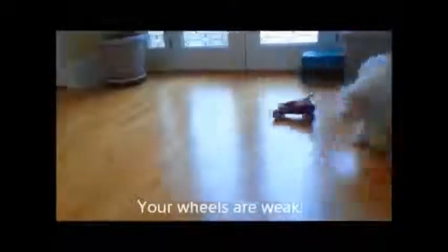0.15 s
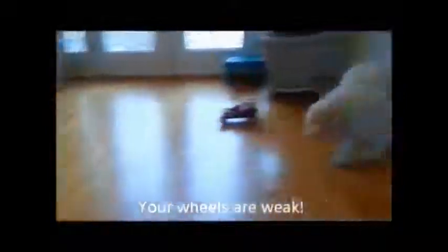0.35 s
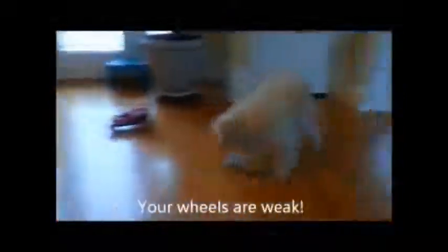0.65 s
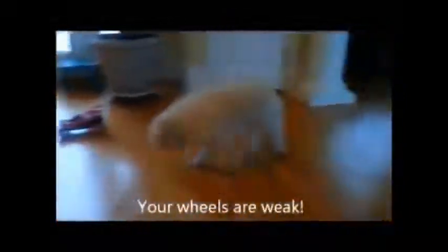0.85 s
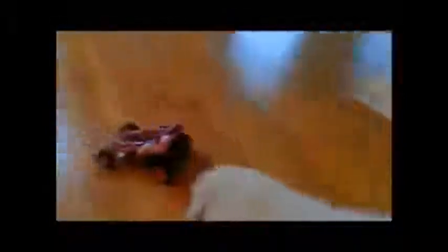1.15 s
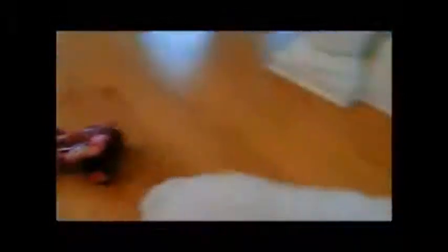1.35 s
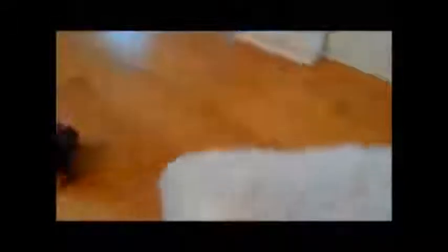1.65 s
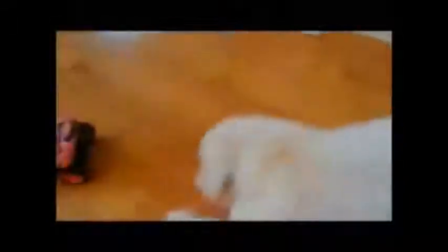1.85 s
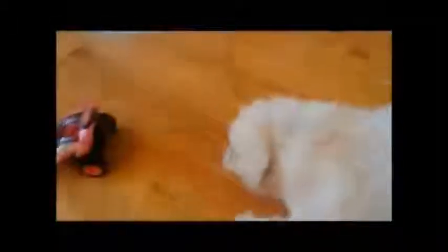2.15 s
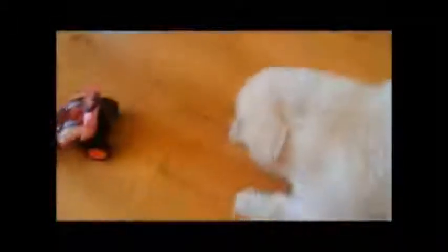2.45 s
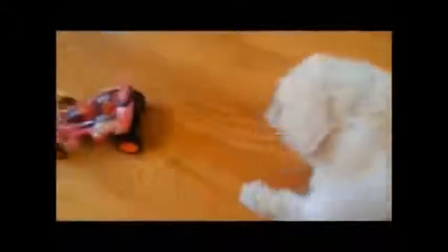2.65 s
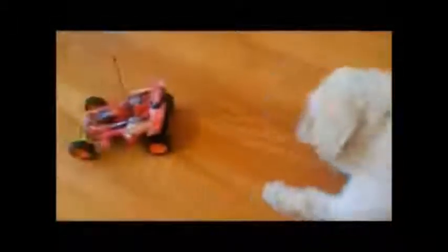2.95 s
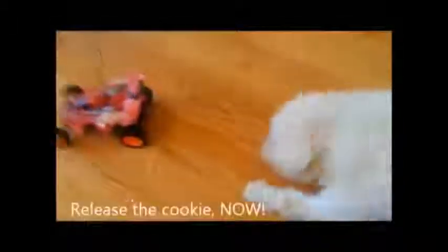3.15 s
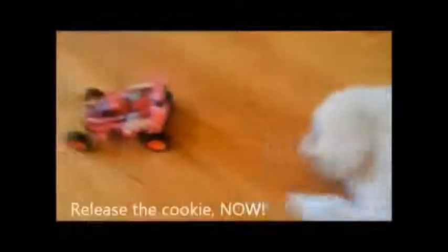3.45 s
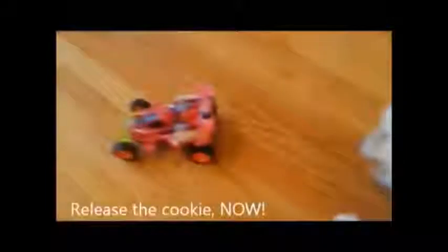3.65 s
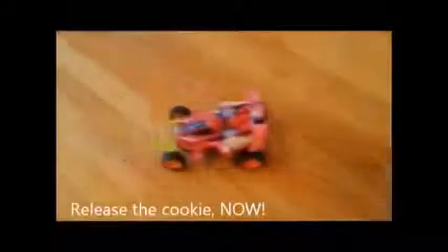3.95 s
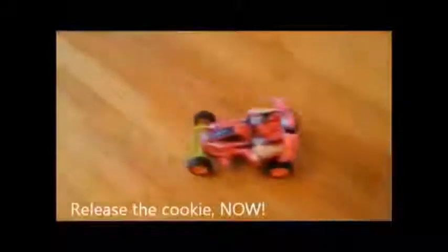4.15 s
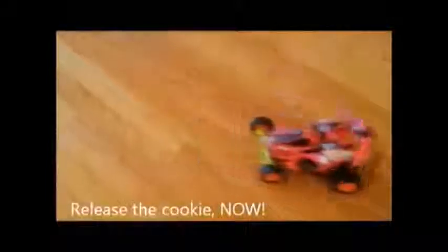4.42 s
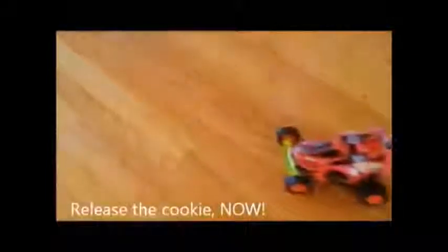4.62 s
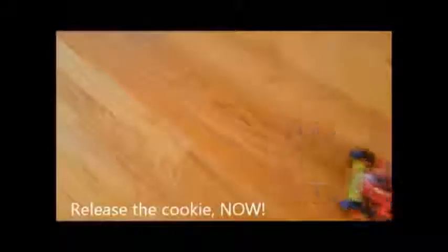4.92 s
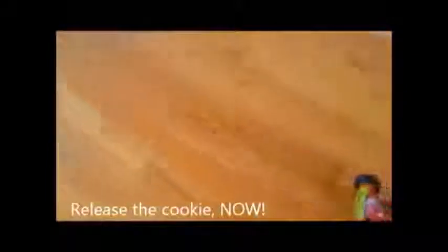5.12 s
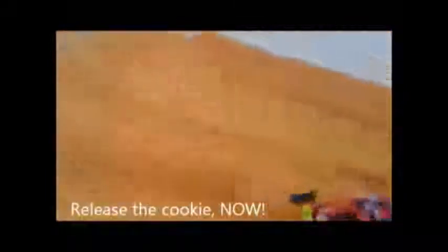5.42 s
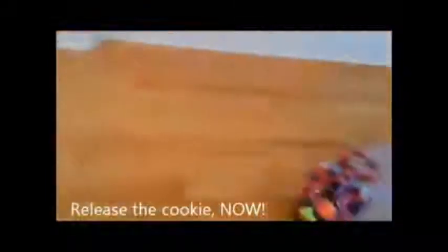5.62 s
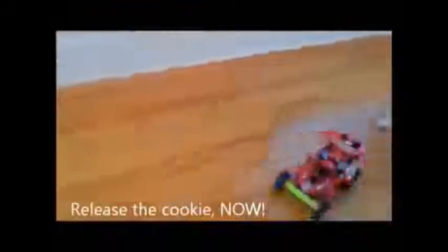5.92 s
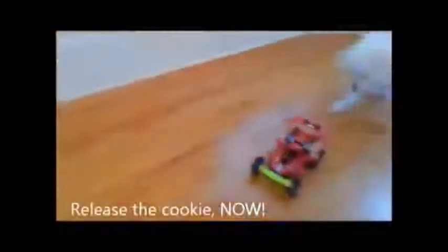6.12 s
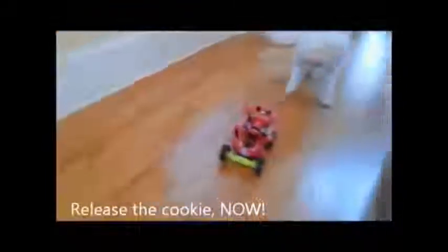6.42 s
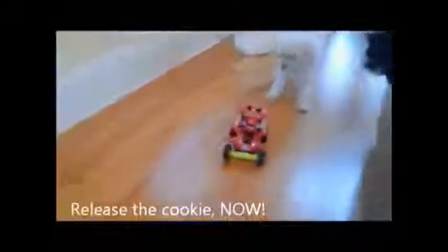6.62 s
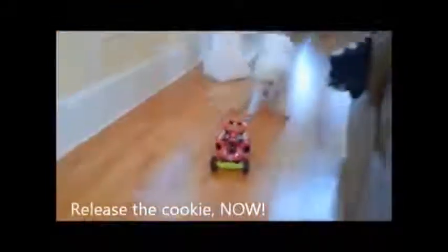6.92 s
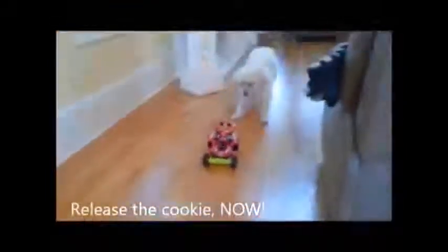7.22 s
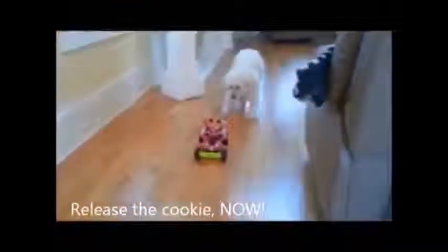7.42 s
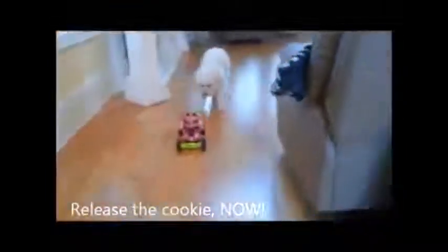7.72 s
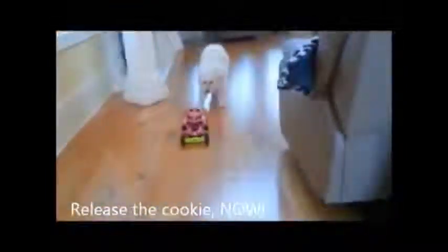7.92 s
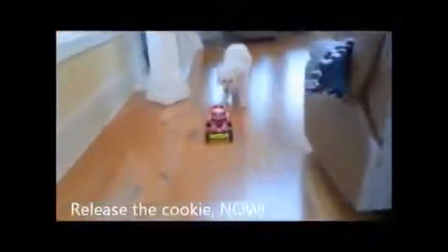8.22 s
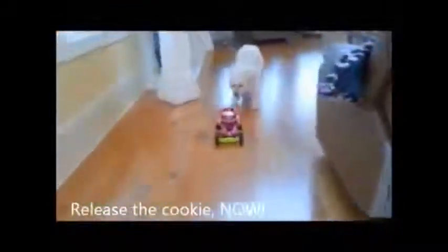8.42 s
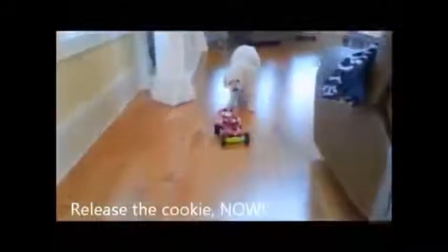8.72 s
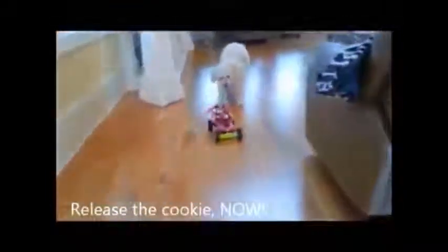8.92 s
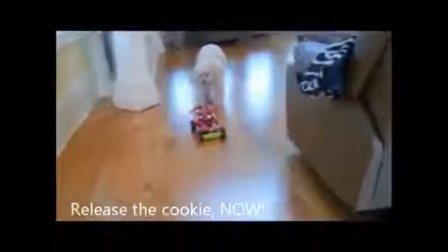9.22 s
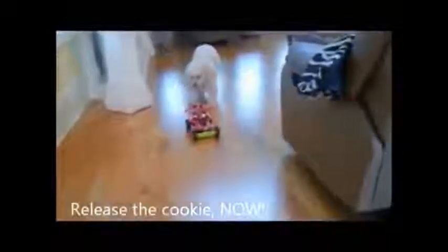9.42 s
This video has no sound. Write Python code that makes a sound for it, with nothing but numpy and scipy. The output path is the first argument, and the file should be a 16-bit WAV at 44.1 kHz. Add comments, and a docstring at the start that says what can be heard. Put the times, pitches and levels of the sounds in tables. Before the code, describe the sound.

A small motorised toy car drives in stop-start bursts on a wooden living-room floor. Gritty gear rasp and whir are strongest in the first few seconds, with a brief dropout just before a sharp restart. Weaker, choppy bursts follow, with plastic clicks and floor knocks clustering around five and six seconds, then a quieter stretch and two last whirs. Close stereo microphone, short room tail, faint deep rumble.

```python
"""Living room with a wooden floor: a toy car with a small geared motor runs in stop-start bursts.
Gears rasp, whir and fizz as shaped noise; wheels drum on the boards as noise through floor resonances.
Clicks are pings with noise bursts, bumps damped tones with ringing boards; a short room tail answers both.
Deep rumble lies below. Two microphone ports hear the car from changing sides.
Early on, the motor, wheels and rumble fade out within about 50 ms and return abruptly."""
import sys
import numpy as np
from scipy import signal
from scipy.fft import rfft, irfft, next_fast_len
from scipy.io import wavfile
from scipy.ndimage import uniform_filter1d, map_coordinates

SR = 44100
rng = np.random.default_rng(int(sys.argv[2]) if len(sys.argv) > 2 else 0)


def bounce(signal):
    """Save signal as a 16-bit WAV file at the path given by the first command-line argument."""
    frames = np.transpose(np.atleast_2d(signal))
    limited = np.clip(frames, -1, 1)
    pcm = np.round(limited * 32767).astype(np.int16)
    wavfile.write(sys.argv[1], SR, pcm)


N = 422037

# car position: time_s, left_over_right_db, left_late_ms, direct_share (0-1)
PLACE = [(.15, 0.4, -0.033, 0), (1.2, 2.2, 0.09, 0.25), (1.3, -1, .12, 0.18), (1.63, 1, 0.14, 0.1),
         (1.82, 0, 0.25, 0), (2.05, 0, 0.24, 0), (2.4, 0.5, 0.22, 0), (3.4, 0.5, 0.11, 0),
         (4.05, 0, 0.12, 0.06), (4.95, 2, -0.13, 0), (5.55, 1.5, -0.24, 0), (6.45, 0.5, -0.047, 0),
         (7.35, 0.5, 0.084, 0), (7.95, 0, 0.12, 0.24), (8.25, 1.5, 0.14, 0.23), (8.55, 0, 0.093, 0),
         (9.5, 0.5, 0.043, 0)]
# floor modes: centre_hz, width_hz, level_db
FLOOR_MODES = [(235, 28, 0), (290, 30, -5), (337, 22, -2), (490, 40, -8), (630, 40, -3)]


def amp(db):
    """dB to gain."""
    return 10 ** (np.asarray(db) / 20)


def unit(x):
    """Scale to rms 1."""
    return x / np.sqrt(np.mean(x ** 2) + 1e-20)


def along(points, hz):
    """Interpolate (Hz, value) points on a log frequency axis."""
    f, v = np.transpose(points)
    return np.interp(np.log(hz + 1), np.log(f + 1), v)


def curves(rows):
    """Interpolate each column after the time to one value per sample."""
    s, *cols = np.transpose(rows)
    return [np.interp(np.arange(N) / SR, s, c) for c in cols]


def wobble(rate_hz):
    """Smooth random curve with rate_hz knots a second."""
    knots = rng.standard_normal(int(N * rate_hz / SR) + 4)
    return map_coordinates(knots, [np.arange(N) * rate_hz / SR])


def filtered(x, response):
    """Multiply the spectrum of x by a response of frequency."""
    m = next_fast_len(x.shape[-1] + 8192)
    spectrum = rfft(x, m) * response(np.fft.rfftfreq(m, 1 / SR))
    return irfft(spectrum, m)[..., :x.shape[-1]]


def coloured(x, spectrum):
    """Shape x by (Hz, dB) points, rms 1."""
    return unit(filtered(x, lambda hz: amp(along(spectrum, hz))))


def modes(table):
    """Causal response of (Hz, width Hz, dB) resonances, summed with alternating sign."""
    def response(hz):
        total = 0
        for k, (centre, width, db) in enumerate(table):
            resonance = 1j * hz * width / (centre * centre - hz * hz + 1j * hz * width)
            total = total + (-1) ** k * amp(db) * resonance
        return total
    return response


def chatter(rate_hz, spread_db, life_s):
    """Irregular contacts: sudden starts of random size, each decaying exponentially; rms 1."""
    sizes = amp(spread_db * rng.standard_normal(N).clip(-2, 2))
    hits = (rng.random(N) < rate_hz / SR) * sizes
    return unit(signal.lfilter([1], [1, -np.exp(-1 / (life_s * SR))], hits))


def patchy(depth_db, ring_db=1.7):
    """Two noises sharing colour drift: broad patches, and narrow longer ones as resonances that come and go."""
    z = signal.stft(rng.standard_normal((2, N)), nperseg=512)[2]

    def patches(bins, frames):
        grid = rng.standard_normal(z.shape[1:])
        return unit(uniform_filter1d(uniform_filter1d(grid, bins, 0), frames, 1))

    drift_db = depth_db * patches(6, 10) + ring_db * patches(2, 24)
    return signal.istft(z * amp(drift_db), nperseg=512)[1][:, :N]


def car():
    """Gears, shell and fizz follow the drive; tooth contacts roughen all three, more at high direct share."""
    # spectra: freq_hz, density_db (per Hz)
    gear_spectrum, shell_spectrum, fizz_spectrum = [(1650, -21), (2800, -65), (3080, -7), (4040, -5.5),
                                                    (4550, -3.5), (5180, -0.5), (6200, -0.5), (7250, 1),
                                                    (8410, -3.5), (9130, -5.5), (9630, -9), (10900, -13),
                                                    (11500, -28), (15000, -111), (22000, -120)], [(440, -13), (750, -19), (818, -26),
                                                                   (926, -6.5), (1160, -2), (1570, -1.5),
                                                                   (1840, 2), (2060, 2.5), (2790, 0.5),
                                                                   (3300, -1.5), (4290, 1), (7260, -120)], [(5880, -67), (10000, -25),
                                                                                  (10800, 24), (12400, 16),
                                                                                  (14500, 8), (14900, -52),
                                                                                  (15200, -27)]
    # gear case resonances: centre_hz, width_hz, level_db
    case_modes = [(3600, 610, 0), (5740, 1040, 2.5), (7100, 810, -7.5)]
    # brief changes of gear bite: centre_s, change_db, half_length_s
    bites = [(.198, 4, .005), (.545, 4, .005), (1.303, 3, .004), (1.395, -0.5, 0.0055), (1.601, 6, 0.0086),
             (1.639, 7, 0.0053), (1.696, 3, 0.0067), (1.8, 2, .006), (1.833, 0, .003), (1.865, -5, .004),
             (1.869, 2, 0.0037), (1.897, 1, 0.005), (2.369, 6.5, .006), (2.402, 7, 0.0026), (2.43, 2, .002),
             (2.455, 4, 0.0058), (2.508, 5, .006), (2.535, 9, 0.0024), (2.768, 3.5, 0.0065),
             (2.837, 4, .01), (2.98, 3, .008), (3.292, 3, 0.014), (3.385, 8, 0.0068), (3.426, 3, 0.0035),
             (3.456, 6.5, 0.0034), (3.492, 4, 0.0051), (4.33, 2.5, 0.0079), (4.384, 3, 0.0065),
             (4.573, 2.5, .01), (5.167, 6, 0.0044), (5.226, 4, 0.0037), (7.312, 1.5, 0.013),
             (7.613, 5.5, .01), (7.78, 3, .015), (8.77, 0.5, 0.0098), (8.875, 3, .006), (9.04, 4, .006),
             (9.155, 4, .005), (9.19, 8.5, 0.0067), (9.312, 5, 0.012), (9.36, 2, .008)]
    rasp_db, whir_db, fizz_db, _ = drive()
    teeth = chatter(rate_hz=750, spread_db=3.5, life_s=.001) * (.7 + .6 * curves(PLACE)[2])

    # uneven wheels and gears throb the load
    judder_db = 1.0 * wobble(28) + 0.24 * wobble(65)
    t = np.arange(N) / SR
    for s, db, half_s in bites:
        judder_db = judder_db + db * np.exp(-((t - s) / half_s) ** 2)

    gears = coloured(patchy(1.2, 2.7) * (.9 + .6 * teeth) * amp(judder_db), gear_spectrum)
    case_ring = filtered(gears, lambda hz: np.abs(modes(case_modes)(hz)))
    gears = unit(gears + 0.44 * case_ring)
    shell = coloured(patchy(1.2, 2.4) * (1.3 + .4 * teeth) * amp(.8 * judder_db), shell_spectrum)
    fizz = coloured(patchy(4, 3) * (1.1 + .3 * teeth) * amp(1.2 * judder_db), fizz_spectrum)
    return band_colour(amp(rasp_db) * gears + amp(whir_db) * shell) + amp(fizz_db) * fizz


def drive():
    """Each burst rises from coasting, holds, falls and coasts: rasp, whir, fizz and axle levels in dB."""
    # throttle bursts: start_s, rise_s, hold_s, fall_s, rasp_db, sag_over_hold_db, coasting_rasp_db,
    # coasting_fade_db_per_s; re rasp: whir_db, fizz_db, axle_whine_db
    bursts = [(0.093, 0.13, 0.013, 0.14, -14, 3.5, -24.5, 3, -9, -15.5, -30),
              (0.321, 0.14, 0.31, 0.13, -21.5, 1, -35.5, 58, -7, -27, -19),
              (1.27, 0.0074, 0.1, 0.046, -18, 0.5, -30, 31, -11, -16, -36),
              (1.567, 0.15, 0.32, 0.092, -17.5, -3, -32, 11, -15.5, -26, -20),
              (2.32, 0.016, 0.072, 0.048, -19.5, 2, -23.5, 3, -17.5, -46, -16),
              (2.424, 0.027, 0.05, 0.041, -16, 3, -33, 56.5, -13, -46, -17.5),
              (2.907, 0.081, 0.011, 0.042, -42, 4, -48.5, 122, -5.5, -10, -19),
              (3.16, 0.028, .01, 0.074, -41, 8, -52.5, 3, -13, -10, -23),
              (3.252, 0.21, 0.039, 0.1, -19.5, 0, -31.5, 67, -10, -27, -15),
              (3.975, 0.032, .01, 0.062, -41.5, -0.5, -47.5, 10.5, -3, -9, -14),
              (4.112, 0.042, .01, 0.038, -37, 8, -40.5, 3, -3, -15, -21),
              (4.21, 0.14, 0.011, 0.1, -21.5, 5.5, -30, 3, -5.5, -22, -25),
              (4.417, 0.13, .01, 0.05, -27, -4, -32.5, 6, -1.5, -25, -38),
              (4.625, 0.062, .01, 0.062, -33, 1.5, -39.5, 28, -0.5, -28, -26),
              (5.002, 0.18, 0.24, 0.057, -27, -3, -29, 3, -3, -23, -17),
              (5.457, 0.07, 0.049, 0.061, -23.5, 2, -35, -7, -2.5, -27, -10),
              (5.83, 0.066, 0.11, 0.025, -29.5, -2.5, -29.5, 3, -1.5, -17.5, -23),
              (6.07, 0.027, 0.057, 0.075, -26.5, -2, -32, 3, -1, -24, -14),
              (6.268, 0.17, 0.11, 0.071, -23, 3.5, -35.5, 51, -5.5, -27, -20.5),
              (6.754, 0.024, .01, 0.086, -33, 2, -37.5, 18, -2, -22, -25),
              (7.081, 0.11, .01, 0.043, -34, 2, -40.5, 8, 0.5, -17, -16),
              (7.388, 0.24, 0.0061, 0.085, -37, -1.5, -38, 25, -3, -17, -20),
              (8.012, 0.034, 0.015, 0.14, -40.5, -0.5, -52.5, 34, -8.5, -14, -20),
              (8.192, .004, 0.0066, 0.018, -43.5, 1, -46, 3, 6, -15, -6),
              (8.24, 0.055, 0.057, 0.15, -39, 2, -56.5, 126, -7.5, -14, -30),
              (8.513, 0.18, 0.11, 0.19, -20, -1, -35, 28, -9, -42, -15),
              (9.111, 0.044, 0.016, 0.051, -30, 1.5, -31.5, 1, -3, -40, -10),
              (9.238, 0.081, 0.02, 0.18, -21.5, -5, -30.5, 3, -10, -50, -12)]
    early_share = 0.47  # share of the dB rise done after a third of its time
    coast_whir_db, still_whir_db = -3, -1.5  # re rasp, as coasting begins and ends
    axle_lingers_db = 5.5  # the whine drops less than the rasp off throttle
    rows, last_s, last_db, fade = [], 0, -31, 0  # opening rasp -31 dB
    for s, rise, hold, fall, top_db, sag_db, coast_db, next_fade, whir_db, fizz_db, axle_db in bursts:
        from_db = last_db - fade * max(s - last_s, 0)
        early_db = from_db + early_share * (top_db - from_db)
        last_s, last_db, fade = s + rise + hold + fall, coast_db, next_fade
        driven = (whir_db, fizz_db, axle_db)
        coasting = (coast_whir_db, fizz_db, axle_db + axle_lingers_db)
        rows += [(s, from_db, still_whir_db, fizz_db, axle_db),
                 (s + rise / 3, early_db, *coasting),
                 (s + rise, top_db, *driven),
                 (s + rise + hold, top_db - sag_db, *driven),
                 (last_s, coast_db, *coasting)]
    rows = np.array(rows)
    rows[:, 0] = np.maximum.accumulate(rows[:, 0])  # keep time in order where bursts overlap
    rasp_db, *others = curves(rows)
    return [rasp_db] + [rasp_db + db for db in others]


def band_colour(x):
    """Tone colour shifts over time: four bands are boosted or cut."""
    # bands: centre_hz, width_hz
    bands = [(2360, 310), (4050, 420), (5300, 660), (7300, 440)]
    # band gains: time_s, then gain_db of each band, low to high
    band_gains = [(.2, 0, -3.5, 0.5, -1), (.7, -3, 2, -1, -0.5), (1.35, 5, 1, 1.5, 3.5),
                  (1.65, -2, 0, 1, 3.5), (1.8, -1, 6, 3.5, 2.5), (1.95, -0.5, 3.5, -4, 0),
                  (2.2, 0, 0.5, 1, -0.5), (2.45, -1.5, 6, -1.5, 4), (2.75, -0.5, -2, 0, -3),
                  (3.45, 3, -0.5, 2, 5.5), (3.8, -1, -3, -1, -5.5), (4.33, 3.5, 2.5, 4.5, 4),
                  (4.7, 3, 0, 0.5, 3), (5.25, 5, 2.5, 2, -1), (5.55, -0.5, 4, 1, -5.5),
                  (5.95, 1, -0.5, 8.5, -3.5), (6.2, -6, -1.5, 1, 3), (6.45, -4, -0.5, 0.5, 2.5),
                  (7.1, -3, -3.5, 1.5, -2), (7.6, 1.5, -3.5, 2, 1.5), (8.75, 1, -1, -0.5, 1),
                  (9.05, 3, 2, 2, 2), (9.35, 0, 3, -5, 0.5)]
    for (hz, width), db in zip(bands, curves(band_gains)):
        x = x + (amp(db) - 1) * filtered(x, modes([(hz, width, 0)]))
    return x


def wheels():
    """Hard wheels crossing grain and joints drum on the floor and ring its boards; the axle whines."""
    # wheel levels: time_s, drumming_db; re drumming: low_board_db, middle_board_db, high_board_db
    wheel_levels = [(0, -35.5, -4, -14, -15), (.28, -30.5, -1.5, -2, -9.5), (.8, -43.5, -3, -7.5, -3.5),
                    (1.09, -56.5, -29, -14, -10), (1.23, -56.5, -17, 0, -14), (1.28, -38, -7, -9, -8),
                    (1.6, -45.5, 0.5, -5, -20), (1.81, -40, -14, -5, -24), (1.96, -35.5, -4, -8, -5.5),
                    (2.15, -44, -10, -8, -14), (2.48, -39.5, -12, -7.5, -19), (2.67, -58.5, -8, -9, -12),
                    (2.88, -65, -17, -14, -7), (3.01, -42, -2, -2, -17), (3.08, -51, 5, 0, -7),
                    (3.22, -61.5, -10, -11, -16), (3.49, -36.5, -9, -22, -12), (3.7, -52, -1, -3, -9),
                    (4.11, -52, -1, -3, -12), (4.19, -41.5, 0, -2, -9), (4.49, -43.5, -5, -16, -0.5),
                    (4.55, -35.5, 1, 0, -6), (4.64, -42, 3, -3, 2), (4.68, -35, 4, 0, 3),
                    (4.76, -41, 5.5, -1, 6), (5.02, -47.5, -4, -11, -4.5), (5.17, -38.5, -8, -15, -1.5),
                    (5.31, -29.5, 2.5, -1, -21), (5.59, -37, -16, -15, -13), (5.65, -50.5, -5, -9, 0),
                    (5.78, -40.5, -8, -4, -14), (5.96, -46.5, -13, -39, 0), (6.06, -42, -10, -5, -8),
                    (6.075, -30, -5, 0, -5), (6.12, -27, -3.5, 1.5, -16), (6.22, -33.5, -6, -8, -8),
                    (6.28, -34.5, -10, 7, -5), (6.35, -37, -1, -5, -4), (6.49, -41, -8, -6, -10),
                    (6.75, -53.5, -3, -21, -16), (6.82, -44.5, 4, -22, -0.5), (7.23, -47.5, -7.5, -11, -7),
                    (7.5, -42, -10.5, -5.5, -20), (7.99, -46, -5.5, -24, -20), (8.15, -59, -2, -10, -24),
                    (8.24, -54, -9, -8, -11), (8.3, -44, -4, -22, -27), (8.5, -62.5, -5, -20, -27),
                    (8.62, -45.5, -25, -30, -7), (8.84, -42, -12, -36, -1), (9.07, -46, -25, 5, -39),
                    (9.32, -42, -4.5, -21, -11), (9.57, -50, -20, -18, -3)]
    # broad drumming: freq_hz, density_db (per Hz)
    drum_spectrum = [(15, -59), (25, -12), (60, -8), (100, -3), (134, -4), (237, -8.5), (330, -11.5),
                     (465, -6.5), (647, -12), (900, -12.5), (1170, -38), (1980, -120)]
    # axle whine: centre_hz, width_hz, level_db
    axle_mode = [(1548, 117, 0)]
    drum_db, low_db, middle_db, high_db = curves(wheel_levels)
    axle_db = drive()[-1]
    joints = 1.1 + .4 * chatter(rate_hz=45, spread_db=4, life_s=.008)

    def ring(table):
        return unit(filtered(joints * rng.standard_normal((2, N)), modes(table)))

    boards = amp(low_db) * ring(FLOOR_MODES[:1])
    boards = boards + amp(middle_db) * ring(FLOOR_MODES[2:3])
    boards = boards + amp(high_db) * ring(FLOOR_MODES[4:])
    drumming = coloured(joints * patchy(1, 2.5), drum_spectrum)
    return amp(drum_db) * (drumming + boards) + amp(axle_db) * ring(axle_mode)


def clicks():
    """Chassis clicks: a short plastic ping at its own pitch, a rattle through the case and a bright edge."""
    # clicks: start_s, level_db, edge_re_level_db, rattle_t60_s (levels before the offsets below)
    click_rows = [(0.042, -12, -10.5, 0.082), (0.085, -8, -15, 0.077), (1.2853, -5, -34, 0.059),
                  (1.63, -12, -31, .02), (2.3295, -13, -19, 0.028), (3.0373, -22.5, -14, 0.088),
                  (3.175, -19, -13, 0.046), (3.182, -24, -18, 0.074), (3.408, -19, -9, .015),
                  (3.4152, -5, -18, 0.033), (3.999, -22, -20, .06), (4.006, -19, -19.5, .04),
                  (4.057, -22, -17, 0.055), (4.144, -23, -25, .03), (4.1627, -14, -30, .03),
                  (4.235, -13.5, -22, 0.033), (4.5083, -11, -32, 0.023), (4.627, -15, -27, .03),
                  (4.69, -10, -30, 0.046), (4.814, -9.5, -18, 0.06), (4.8245, -10.5, -11, 0.018),
                  (4.859, -13, -16, 0.074), (5.034, -18, -17, 0.04), (5.038, -22, -15, .03),
                  (5.079, -17, -15, 0.045), (5.086, -9, -23, .02), (5.1376, -24, -36, .05),
                  (5.2545, -4, -12, 0.04), (5.258, -9, -16, .05), (5.496, -11, -21, 0.064),
                  (6.0692, 0, -24, 0.051), (6.1255, -6, -24, 0.014), (6.772, -6, -23, 0.034),
                  (7.6255, -13, -15, 0.05), (7.985, -23.5, -20, 0.024), (8.015, -18, -16, .035),
                  (8.202, -29, -26, 0.03), (8.296, -18.5, -33, 0.057), (8.3567, -24, -15, 0.055),
                  (8.539, -33, -13, .04), (8.578, -27, -35, 0.07), (9.253, -5, -18, 0.03)]
    # rattle and edge colour: freq_hz, gain_db
    rattle_colour, edge_colour = [(300, -41), (1000, -13), (3500, -8), (6000, 1), (8000, -2), (11000, -28),
                                  (13000, -40)], [(8000, -17), (10500, -2.5), (15000, -15)]
    ping, rattle, edge = np.zeros((3, 2, N + SR))
    t = np.arange(SR // 5) / SR
    for s, db, edge_db, t60 in click_rows:
        span = slice(round(s * SR), round(s * SR) + len(t))
        hz = rng.normal(6770, 540)  # mean and spread, Hz
        burst = rng.standard_normal((2, len(t))) * amp(-60 * t / t60)
        phase = rng.uniform(0, 2 * np.pi, (2, 1))
        tone = np.sin(2 * np.pi * hz * t + phase) * (1 - np.exp(-t / .0003))
        ping[:, span] += amp(db - 3.5 - 60 * t / .01) * tone
        rattle[:, span] += amp(db - 3.0) * burst * (1 - np.exp(-t / .00086))
        edge[:, span] += amp(db + edge_db + 7) * burst * amp(-60 * t / .076)  # decays on top of the burst's
    rattle = filtered(rattle[:, :N], lambda hz: amp(along(rattle_colour, hz)))
    edge = filtered(edge[:, :N], lambda hz: amp(along(edge_colour, hz)))
    return ping[:, :N] + rattle + edge


def bumps():
    """A damped push at its own pitch, a knock about an octave up, and the boards ringing after it."""
    # bumps: start_s, level_db (before +4 dB on the push), pitch_hz, knock_re_push_db,
    # board_drive_re_level_db, board_drive_t60_s
    bump_rows = [(1.684, -22, 228, -15, 17.5, 0.059), (2.208, -25.5, 175, -4, 19, 0.081),
                 (2.983, -35, 604, -14, 23, .07), (3.448, -26, 293, -7, 9, 0.07),
                 (3.84, -39, 615, -13, 10, 0.097), (4.154, -33, 357, -17, 25, 0.07),
                 (4.671, -20.5, 233, -11, 20, 0.085), (5.255, -7, 315, -3.5, 20, 0.049),
                 (5.718, -31, 237, -18, 26.5, 0.072), (5.997, -26, 317, -17, 21, 0.086),
                 (6.068, -13, 302, 0, 22.5, 0.04), (6.1, -20, 215, -12, 13, 0.078),
                 (6.771, -30, 231, -15, 24, 0.11), (7.058, -34, 2000, -30, -10, .05),
                 (7.985, -40, 216, -3, 27, 0.065), (8.201, -36, 370, -10, 11, 0.065),
                 (8.2478, -13, 207, -16, -1, 0.041), (9.034, -25, 129, -6, 19, 0.1),
                 (9.55, -27.5, 540, -11, 14.5, 0.06)]
    push, blows = np.zeros(N + SR), np.zeros(N + SR)
    t = np.arange(SR // 3) / SR
    rise = 1 - np.exp(-(t / .002) ** 2)  # each bump swells in over about 2 ms
    for s, db, hz, knock_db, ring_db, t60 in bump_rows:
        span = slice(round(s * SR), round(s * SR) + len(t))
        tone = np.sin(2 * np.pi * hz * t) + amp(knock_db) * np.sin(2 * np.pi * 2.16 * hz * t)
        push[span] += amp(db + 4 - 60 * t / (.55 * t60)) * rise * tone
        blows[span] += amp(db + ring_db - 60 * t / t60) * rise * rng.standard_normal(len(t))
    return push[:N] + filtered(blows[:N], modes(FLOOR_MODES))


def room(x):
    """Diffuse noise tail after a 300-sample delay; each frequency dies at its own speed."""
    # decay: freq_hz, t60_s
    decay = [(200, 0.54), (2000, 0.31), (10000, 0.66)]
    hz, t, z = signal.stft(rng.standard_normal((2, SR // 2)), SR, nperseg=256)
    tail = signal.istft(z * amp(-60 * t / along(decay, hz)[:, None]), SR, nperseg=256)[1]
    tail = tail / np.linalg.norm(tail[0])
    return signal.fftconvolve(np.pad(x, (300, 0))[None], tail, axes=1)[:, :N]


def house_rumble():
    """Deep, slowly wavering rumble indoors: low-frequency noise."""
    # rumble: freq_hz, density_db (per Hz)
    rumble_spectrum = [(15, -30), (30, -4), (70, 0), (140, -8), (260, -60), (500, -120)]
    level_db = -62 + 2.5 * wobble(3)
    return amp(level_db) * coloured(rng.standard_normal((2, N)), rumble_spectrum)


def ports(pair):
    """Mix two signals so that left and right are alike at low frequencies and differ at high ones."""
    # left-right likeness: freq_hz, correlation (0-1)
    likeness = [(30, 0.89), (100, 0.84), (300, 0.83), (700, 0.35), (1500, 0.27), (5000, 0.1),
                (12000, 0.026)]

    def mid_side_gains(hz):
        angle = np.arccos(np.clip(along(likeness, hz), -1, 1)) / 2
        return np.array([np.cos(angle), np.sin(angle)])

    mid, side = filtered(pair, mid_side_gains)
    return np.array([mid + side, mid - side])


def nearer(pair):
    """Direct sound makes the two ports more alike."""
    share = np.clip(curves(PLACE)[2], 0, .95)
    mid = (pair[0] + pair[1]) / 2 * np.sqrt(1 + share)
    side = (pair[0] - pair[1]) / 2 * np.sqrt(1 - share)
    return np.array([mid + side, mid - side])


def scene():
    """Sum the layers; level and arrival time differ between the ports as the car moves."""
    # fade-out and abrupt return: time_s, gain_db
    fade_rows = [(1.232, 0), (1.243, -17), (1.265, -30), (1.279, -45), (1.283, 0)]
    snaps, knocks = clicks(), bumps()
    fade = amp(curves(fade_rows)[0])
    sound = nearer(ports(fade * car() + snaps))
    sound = sound + ports(fade * wheels()) + knocks
    sound = sound + amp(-13.5) * room(knocks + snaps[0])
    sound = sound + fade * house_rumble()

    pan_db, late_ms, _ = curves(PLACE)
    half = np.array([[.5], [-.5]])  # left, right
    panned = amp(half * pan_db) * sound
    read = np.arange(N) - half * late_ms * SR / 1000
    return np.array([map_coordinates(x, [at], order=5) for x, at in zip(panned, read)])


def record(dry):
    """Port colours differ, bass drops below 70 Hz, peaks round off near 0.95, nothing passes 15340 Hz."""
    # port colour: freq_hz, left_over_right_db
    port_tilt = [(60, -2), (130, -0.5), (290, 2.5), (630, 1.5), (1390, 1), (3060, 0), (4300, 1.5),
                 (5450, 5), (6200, 0), (7150, -10), (8400, -4), (10000, -0.5), (14700, -1)]

    def response(hz):
        colour = amp(along(port_tilt, hz) * np.array([[.5], [-.5]]))
        return colour * (1j * hz / (70 + 1j * hz)) ** 2

    mic = filtered(dry, response)
    mic = mic / (1 + np.abs(mic / .95) ** 4) ** (1 / 4)
    return filtered(mic, lambda hz: hz < 15340)


dry = scene()
out = record(dry)
bounce(out)
```